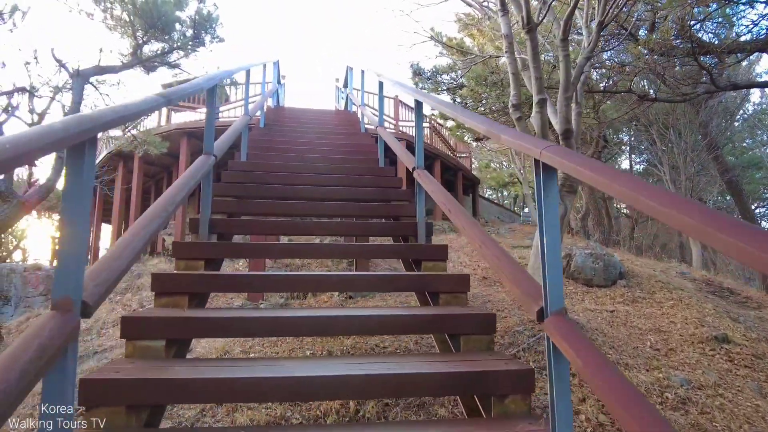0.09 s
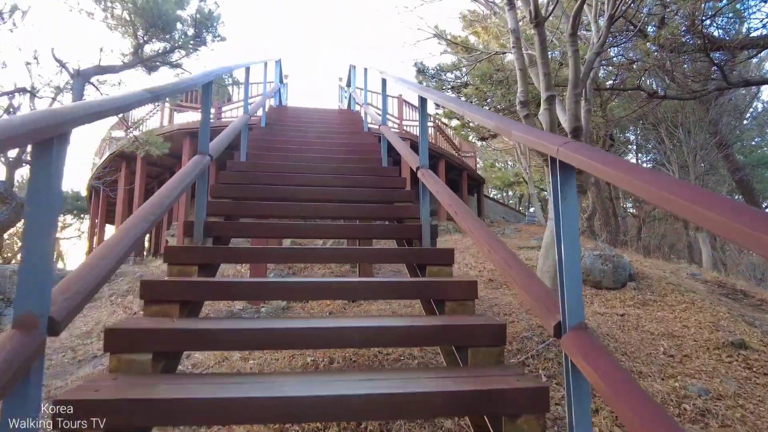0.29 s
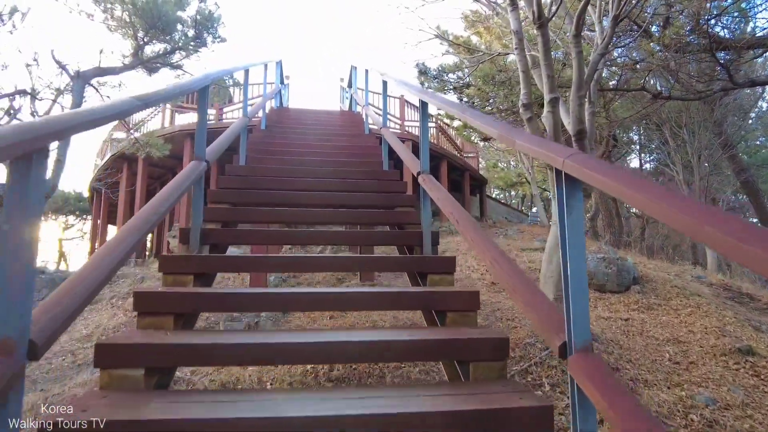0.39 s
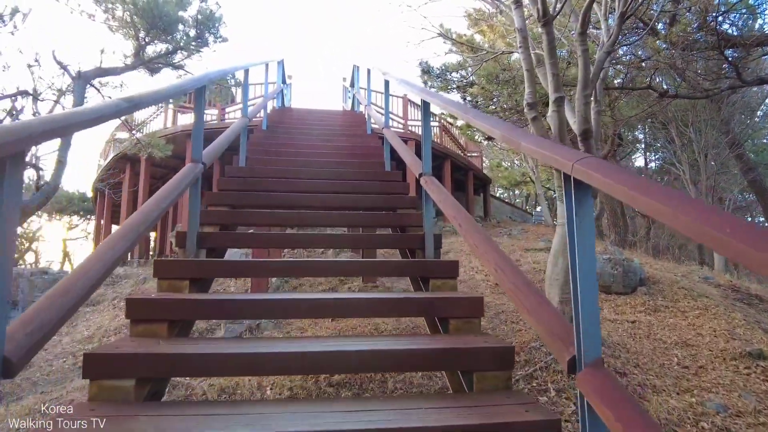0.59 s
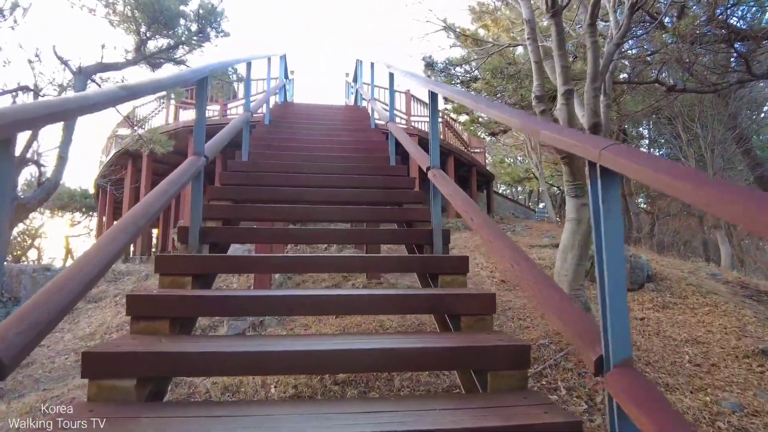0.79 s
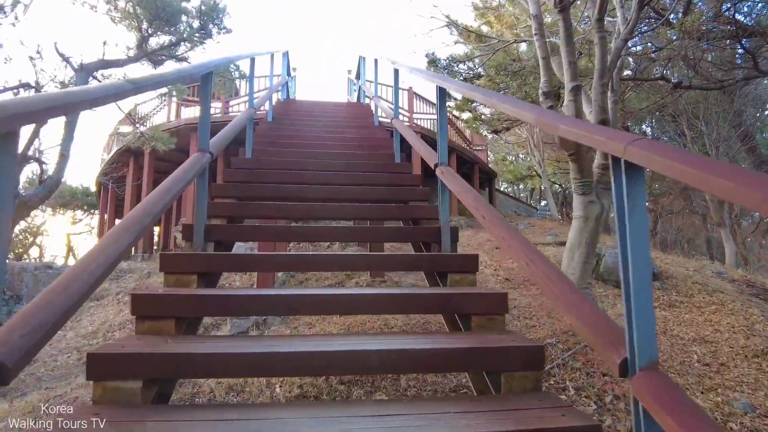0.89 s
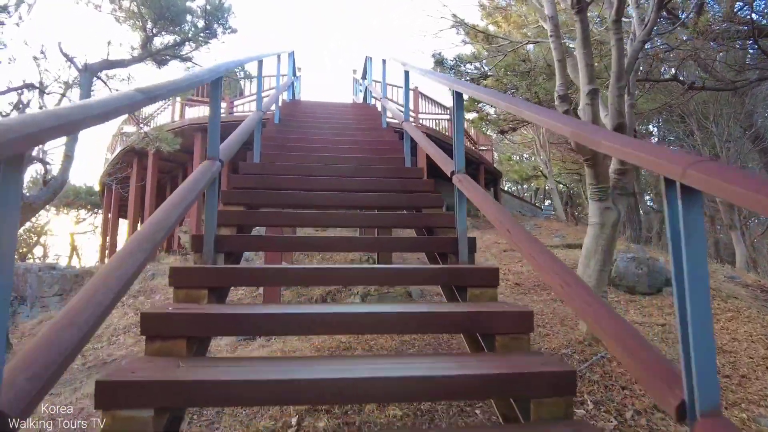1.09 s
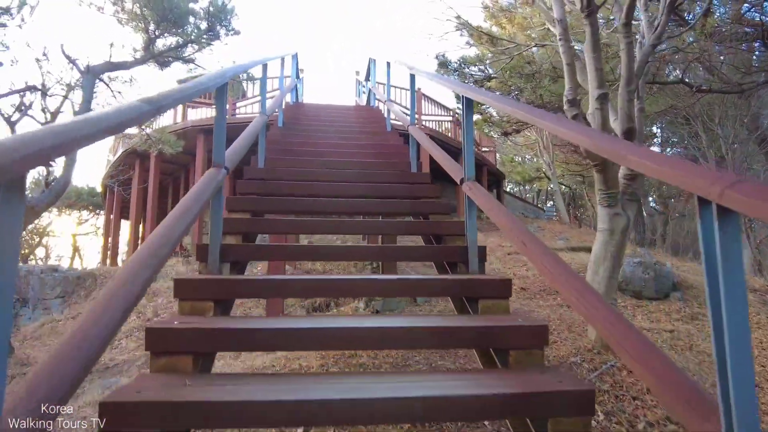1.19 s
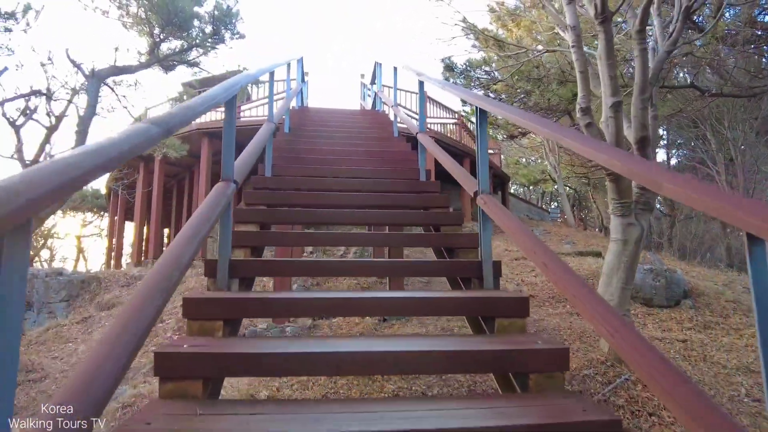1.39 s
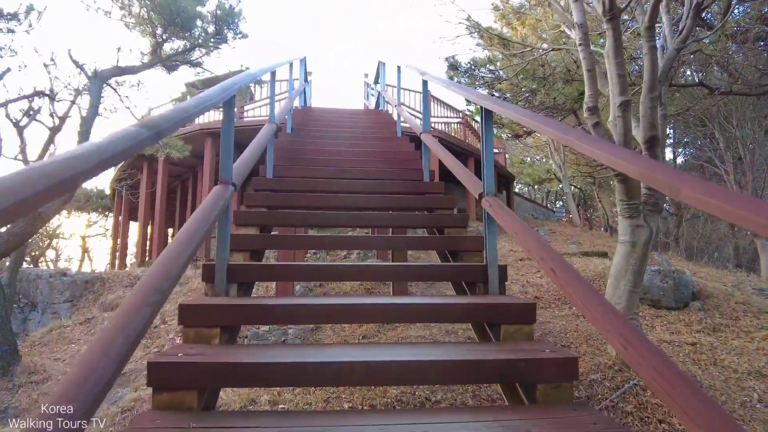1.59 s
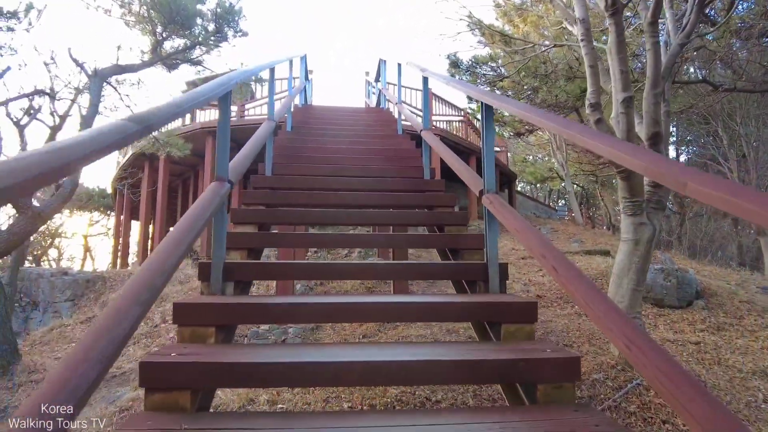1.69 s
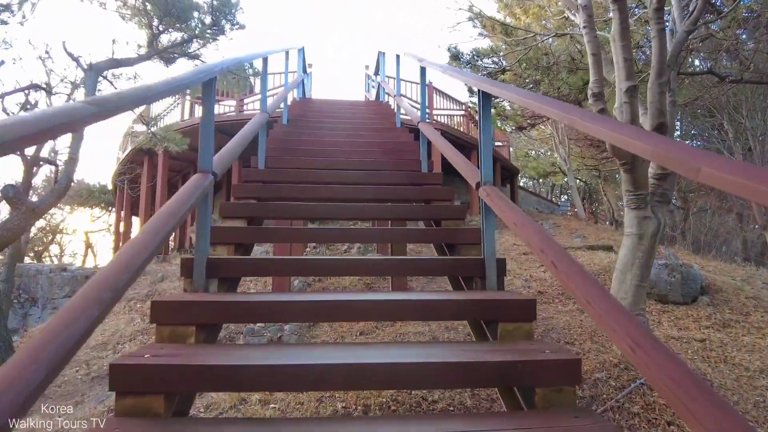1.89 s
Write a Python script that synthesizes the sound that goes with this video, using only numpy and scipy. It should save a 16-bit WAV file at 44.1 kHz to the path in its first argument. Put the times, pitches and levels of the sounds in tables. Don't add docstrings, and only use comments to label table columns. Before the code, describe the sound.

Footsteps of one walker on an open wooden stair outdoors, miked close in stereo. At 0.22 s a boot knocks a tread, with low frame thump and short post ring at right. Cloth swishes near 0.7 s. A lighter, crackling step lands at 1.09 s, a hard, deeper one at 1.48 s with small taps. Grit ticks; fabric and strap rasp near 1.9 s. Faint far town rumble and airy hiss throughout.

```python
import sys
import numpy as np
from scipy import signal
from scipy.fft import rfft, irfft, next_fast_len
from scipy.io import wavfile
from scipy.ndimage import uniform_filter1d, map_coordinates

SR = 44100
rng = np.random.default_rng(int(sys.argv[2]) if len(sys.argv) > 2 else 0)


def int16_out(signal):
    q = np.round(np.clip(np.atleast_2d(signal).T, -1, 1) * 32767)
    wavfile.write(sys.argv[1], SR, q.astype(np.int16))


def natural_amplitude(level_db):
    exponent = np.asarray(level_db, float) / 20
    return 10 ** exponent


N = 83790


def unit(x):
    return x / np.sqrt(np.mean(x ** 2) + 1e-20)


def along(points, hz):
    f, v = np.transpose(points)
    return np.interp(np.log(hz + 1), np.log(f + 1), v)


def wobble(rate):
    knots = rng.standard_normal(int(N * rate / SR) + 4)
    return map_coordinates(knots, [np.arange(N) * rate / SR])


def swell(peak_s, rise_s, fall_s):
    since = np.arange(N) / SR - peak_s
    return np.exp(-(since / np.where(since < 0, rise_s, fall_s)) ** 2 / 2)


def filtered(x, response):
    m = next_fast_len(N + SR // 2)
    return irfft(rfft(x, m) * response(np.fft.rfftfreq(m, 1 / SR)), m)[..., :N]


def ports(x, turn):
    # frequency in Hz, lead of the left microphone in radians.
    left_leads = [(100, 0), (300, .35), (600, .9), (1050, 2.1), (1500, .2), (3000, 1.2), (8000, 1.5)]
    right = filtered(x, lambda hz: np.exp(-1j * turn * along(left_leads, hz)))
    return np.array([x, right])


def rush(spectrum, alike, patchy_db):
    z = signal.stft(rng.standard_normal((2, N)), nperseg=512)[2]
    field = uniform_filter1d(rng.standard_normal(z.shape[1:]), 6, 0)
    field = uniform_filter1d(field, 10, 1)
    pair = signal.istft(z * natural_amplitude(patchy_db * unit(field)), nperseg=512)[1][:, :N]

    def mid_and_side(hz):
        angle = np.arccos(np.clip(along(alike, hz), -1, 1)) / 2
        return natural_amplitude(along(spectrum, hz)) * [np.cos(angle), np.sin(angle)]

    mid, side = filtered(pair, mid_and_side)
    return unit(np.array([mid + side, mid - side]))


def scatter(x):
    # frequency in Hz, time to fall 60 dB in seconds.
    decay = [(150, 0.5), (500, 0.093), (1200, 0.075), (3000, 0.12), (8000, 0.0066)]
    hz, t, z = signal.stft(rng.standard_normal((2, SR // 4)), SR, nperseg=256)
    fade = natural_amplitude(-60 * t / along(decay, hz)[:, None])
    tail = signal.istft(z * fade, SR, nperseg=256)[1]
    tail = filtered(tail, lambda f: f ** 2 / (f ** 2 + 220 ** 2))[:, :SR // 4]
    return signal.fftconvolve(x[None], tail / np.linalg.norm(tail[0]), axes=1)[:, :N]


def pings(rows):
    out, t = np.zeros(N + SR), np.arange(SR // 20) / SR
    for s, db, hz, width in rows:
        envelope = (1 - np.exp(-t * hz)) * np.exp(-np.pi * width * t)
        out[round(s * SR):][:len(t)] -= natural_amplitude(db + 6.5) * envelope * np.sin(2 * np.pi * hz * t)
    return out[:N]


def background():
    # frequency in Hz, density in dB per Hz.
    town = [(15, -8), (30, 2.5), (60, -7), (85, -12.5), (130, -11.5), (250, -23.5), (440, -25.5),
            (900, -45.5), (1900, -120)]
    drone = [(40, -56), (52, 1), (60, -7.5), (68, 7), (85, -22.5), (200, -120)]
    air = [(410, -29), (700, -5.5), (1400, -5), (2000, -12), (4000, -16), (9000, -23), (12000, -27),
           (14500, -23.5)]
    # frequency in Hz, likeness of the two microphones from 0 to 1.
    far_alike = [(60, 0.98), (200, 0.96), (400, 0.61), (1000, .0), (1500, 0.57), (4000, 0.53),
                 (12000, 0.41)]
    hiss = natural_amplitude(-71) * rush(air, far_alike, patchy_db=1.3)
    hum = natural_amplitude(-51) * rush(drone, far_alike, patchy_db=-2.3)
    rumble = natural_amplitude(-49) * rush(town, far_alike, patchy_db=2.0)
    return hiss + hum + rumble


def strap():
    # peak in seconds, rise in seconds, fall in seconds, level in dB, centre in Hz.
    rasps = [
        (.245, .008, .014, -59, 820),
        (1.1, .006, .014, -59, 1350),
        (1.51, .012, .025, -58, 850),
        (1.41, .008, .04, -67, 1600),
        (1.5, .01, .015, -75, 5300),
        (1.858, .03, .025, -63.5, 2700),
        (1.895, .03, .03, -62, 5000),
    ]
    width_octaves = 0.32
    out = 0
    for s, rise, fall, db, hz in rasps:
        own, shared = rng.standard_normal((2, N)), 0.44 * rng.standard_normal(N)
        band = filtered(own + shared, lambda f: np.exp(-(np.log2((f + 1) / hz) / width_octaves) ** 2 / 2))
        out = out + natural_amplitude(db) * swell(s, rise, fall) * unit(band)
    return out * natural_amplitude([[1.2], [-1.2]])


def cloth():
    # peak in seconds, rise in seconds, fall in seconds, level in dB, tilt in dB per octave.
    strokes = [(.1, 0.025, 0.019, -73.5, 8.5), (.18, 0.049, 0.079, -60.5, 6), (.33, 0.21, 0.069, -60, -1),
               (.6, 0.041, 0.026, -63.5, 0.3), (0.699, 0.066, 0.034, -55, 2),
               (.78, 0.064, 0.028, -60.5, 0.5), (.9, 0.02, 0.069, -72.5, -0.5),
               (1.16, 0.076, 0.03, -63.5, 0.6), (1.41, 0.011, 0.045, -65.5, -0.5),
               (1.503, 0.017, 0.036, -64, 5.5), (1.62, 0.044, 0.024, -63.5, 8),
               (1.851, 0.087, 0.015, -64, 4.5), (1.9, 0.022, .03, -55.5, 5.5)]
    # frequency in Hz, density in dB per Hz.
    fabric = [(290, 1), (500, -0.5), (1200, -1), (2150, -6), (4230, -11), (9500, -24), (13000, -30),
              (15000, -23.5)]
    # frequency in Hz, likeness of the two microphones from 0 to 1.
    cloth_alike = [(500, 0.27), (1000, 0.75), (1500, .95), (3000, 0.65), (8000, 0.45), (15000, 0.21)]
    pivot_hz = 2500
    grain_db = wobble(300) + .2 * wobble(27)
    grainy = natural_amplitude(grain_db) * rush(fabric, cloth_alike, patchy_db=2.5)
    both = np.array([grainy[0], ports(grainy[1], 0.85)[1]])
    out = 0
    for s, rise, fall, db, tilt in strokes:
        tone = unit(filtered(both, lambda f: natural_amplitude(tilt * np.log2((f + 200) / pivot_hz))))
        out = out + natural_amplitude(db) * swell(s, rise, fall) * tone
    return out * natural_amplitude([[.8], [-.8]])


def grit():
    # start in seconds, peak in dB, pitch in Hz, width in Hz.
    grains = [(0.0787, -46.5, 1410, 500), (.3465, -47, 2200, 500), (.3483, -42, 1250, 400),
              (.351, -52.5, 1600, 250), (0.3517, -55.5, 3050, 200), (.356, -54, 1400, 250),
              (0.5451, -41.5, 1830, 900), (0.7747, -44, 1440, 300), (1.0455, -51, 1510, 250),
              (1.0745, -21.5, 300, 300), (1.0752, -49, 2700, 700), (1.08, -34, 400, 400),
              (1.086, -47, 1200, 900), (1.0867, -22, 930, 900), (1.485, -49, 2400, 700),
              (1.4895, -50.5, 2200, 700), (1.4935, -54, 1800, 700), (1.572, -53.5, 1400, 300),
              (1.3123, -54.5, 2800, 900), (1.5783, -39.5, 1240, 900), (1.5776, -47, 3700, 1630),
              (1.578, -46.5, 2600, 1400), (1.677, -59, 8000, 1500), (1.737, -54, 7700, 2000),
              (1.817, -70, 2000, 2060)]
    ticks = pings(grains)
    return ports(ticks, 0.18) + natural_amplitude(-8) * scatter(ticks)


def side_tones():
    # start in seconds, peak in dB, pitch in Hz, width in Hz.
    tones = [
        (.2205, -38, 1090, 40),
        (.2285, -25, 1090, 60),
        (1.0875, -34, 1090, 70),
        (1.484, -38, 720, 60),
    ]
    return natural_amplitude(-14) * pings(tones) * np.array([[-.5], [1]])


def frame():
    # peak in seconds, level in dB, pitch in Hz, rise in seconds, fall in seconds.
    flexes = [(0.237, -21.5, 132, 0.0049, 0.0065), (.268, -25, 107.5, 0.01, 0.0083),
              (0.305, -33.5, 114.4, 0.0072, 0.011), (0.359, -35.5, 111.7, 0.038, 0.014),
              (.392, -46.5, 117, 0.0048, 0.011), (0.431, -49.5, 104, .015, 0.056),
              (0.229, -34, 202, 0.0023, 0.0057), (.34, -54, 180.7, 0.054, 0.051),
              (1.108, -38.5, 116.3, 0.021, 0.017), (1.229, -50, 108.9, 0.25, 0.025),
              (.86, -62.5, 400, 0.016, 0.0067), (.95, -59.5, 446, .01, 0.0067),
              (1.277, -48.5, 222, 0.0036, 0.0059), (1.511, -30.5, 118, 0.011, 0.013),
              (1.678, -49.5, 119, 0.03, 0.023)]
    t = np.arange(N) / SR
    return sum(natural_amplitude(db) * swell(s, rise, fall) * np.cos(2 * np.pi * hz * (t - s))
               for s, db, hz, rise, fall in flexes)


def step(tread, blows, turn, spread_db, scuff_db, sense):
    t, lag = np.arange(N) / SR, np.arange(SR // 2) / SR
    push = 0
    for s, db, contact_s in blows:
        since = np.maximum(t - s, 0) / contact_s
        push = push + natural_amplitude(db) * since * np.exp(-since) / (contact_s * SR)
    ring = 0
    for k, (hz, width, db) in enumerate(tread):
        mode = np.exp(-np.pi * width * lag) * np.sin(2 * np.pi * hz * lag)
        ring = ring + sense ** k * natural_amplitude(db) * width / 20 * mode
    rubber_hz = 4760
    knock = filtered(signal.fftconvolve(push, ring)[:N],
                     lambda f: (1j * f / (70 + 1j * f)) ** 2 / (1 + (f / rubber_hz) ** 4))

    land = max(blows, key=lambda b: b[1])[0]
    slide_s, stop_s, scuff_hz = .009, 0.012, 1200
    rub = filtered(rng.standard_normal((2, N)), lambda f: f / (f + 300) / (1 + (f / scuff_hz) ** 4))
    slide = np.exp(-np.abs(t - land) / np.where(t < land, slide_s, stop_s))
    scuff = natural_amplitude(scuff_db) * slide * unit(rub)
    return ports(knock, turn) + natural_amplitude(spread_db) * scatter(knock) + scuff


def scene():
    # frequency in Hz, width in Hz, level in dB.
    treads = [[(126, 31, -18), (180, 35, 3), (450, 44, -10), (637, 100, -7), (853, 88, -7), (998, 120, -6),
               (1148, 130, -10.5), (1800, 60, -14.5), (2240, 270, -21.5), (2960, 1100, -24.5),
               (4000, 320, -27.5)], [(118, 13, -24), (194, 44, -9.5), (284, 58, -7), (400, 70, -9.5),
                                (547, 86, -9.5), (1030, 136, -4.5), (1270, 94, -10.5), (1454, 110, -13),
                                (2800, 650, -30)], [(106, 34, -1.5), (171, 18, -1), (250, 40, -11.5),
                                                 (407, 41.5, -0.5), (600, 62, -3), (644, 40, -7.5),
                                                 (840, 170, -15.5), (1020, 130, -23.5), (1270, 170, -17),
                                                 (1520, 510, -27.5), (1850, 340, -36.5), (2400, 500, -45.5)]]
    # start in seconds, strength in dB, contact in seconds.
    first = [
        (0.2178, -42.5, 0.00017),
        (0.2252, -27, 0.000063),
        (0.2275, -34, 0.00018),
        (0.26, -35.5, 0.00087),
    ]
    second = [
        (1.0761, -48.5, 0.00013),
        (1.0805, -51.5, 0.00037),
        (1.0872, -34.5, 0.000079),
        (1.0957, -43, 0.00031),
    ]
    third = [
        (1.478, -44, 0.00029),
        (1.4836, -23, 0.00024),
        (1.4868, -34.5, 0.00011),
        (1.4907, -40, 0.00033),
        (1.4945, -36, 0.0001),
        (1.51, -48, 0.00016),
    ]
    turns = [.7, 1.1, -1.6]
    spread_dbs = [-12, -15, -10]
    scuff_dbs = [-42, -48, -46]
    senses = [-1, 1, -1]
    steps = zip(treads, [first, second, third], turns, spread_dbs, scuff_dbs, senses)
    climb = sum(step(*row) for row in steps)
    return climb + frame() + grit() + cloth() + background() + strap() + side_tones()


def band_limit(x):
    return signal.sosfilt(signal.butter(12, 16810, fs=SR, output="sos"), x)


def record(dry):
    top_hz = 15690
    mix = filtered(dry, lambda f: f < top_hz)
    return band_limit(mix)


dry = scene()
out = record(dry)
int16_out(out)
```